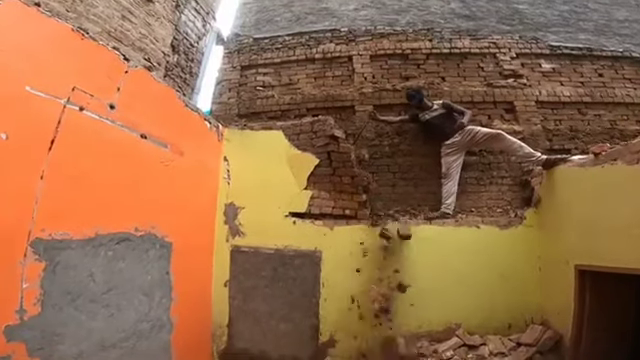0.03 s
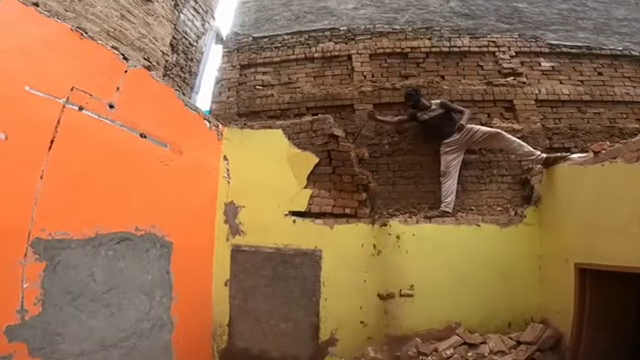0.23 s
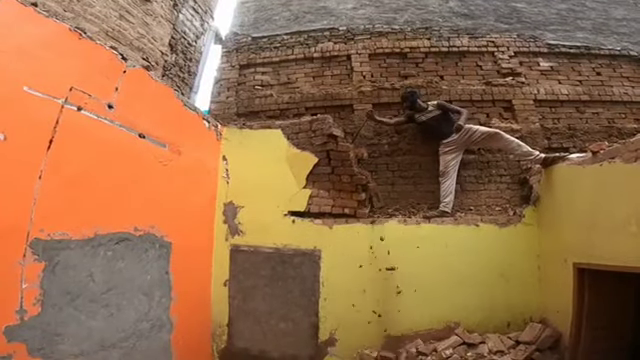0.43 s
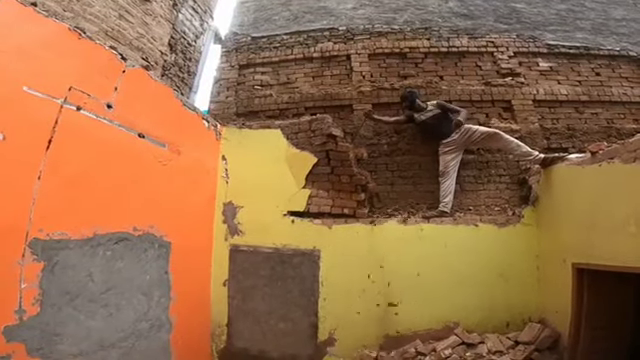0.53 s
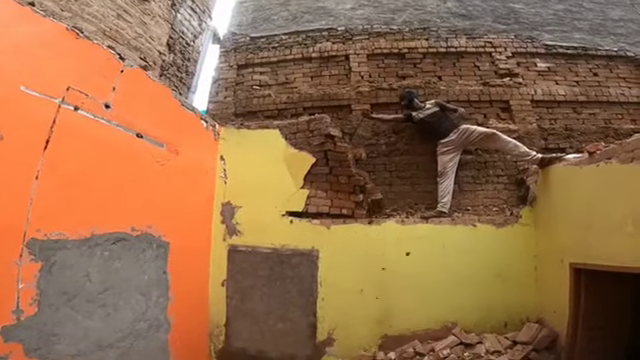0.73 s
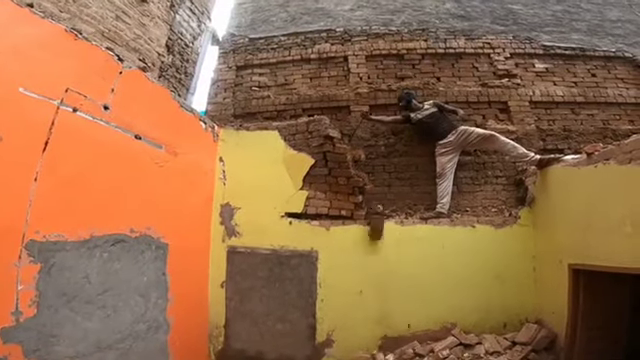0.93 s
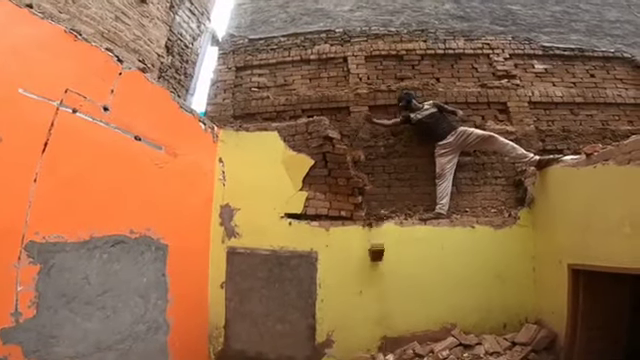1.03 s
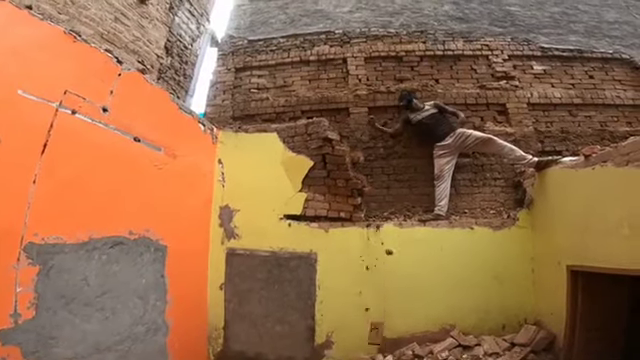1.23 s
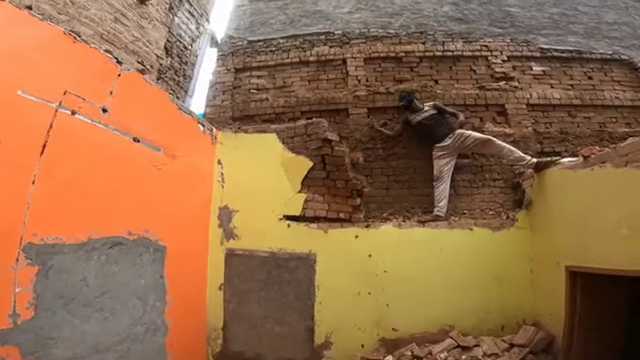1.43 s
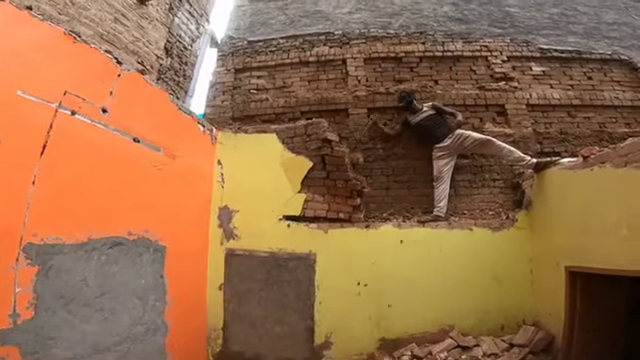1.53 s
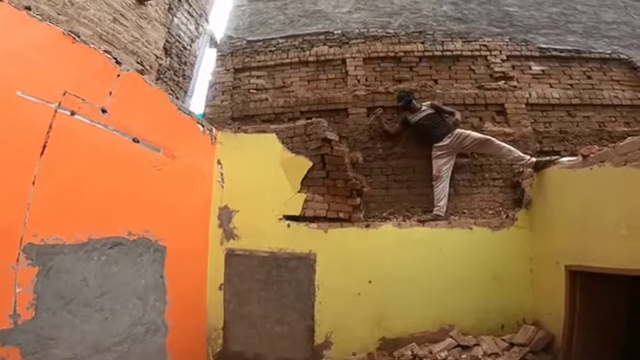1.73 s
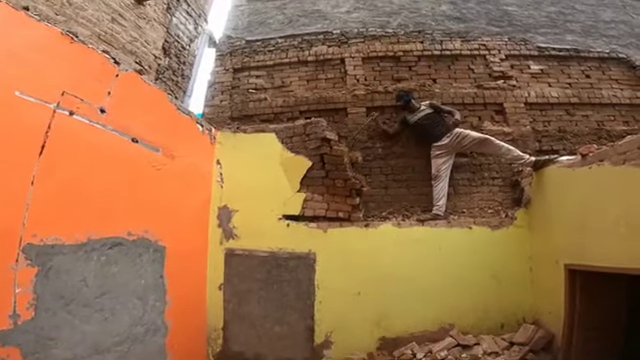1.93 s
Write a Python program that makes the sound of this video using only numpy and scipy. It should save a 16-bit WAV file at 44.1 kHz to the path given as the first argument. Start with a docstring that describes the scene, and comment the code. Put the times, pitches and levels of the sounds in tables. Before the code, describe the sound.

Falling bricks crunch, knock and clink on nearby rubble in a quick flurry. Small chips and grit follow, then one more heavy piece hits with a short ring, in a bare-walled room open to a faint outdoor hush.

```python
"""A roofless, bare-walled room, one microphone near a rubble heap as bricks and lumps of mortar drop on it.
Each landing is a short crunch of brittle modes, a knock and a few flying chips. Hard shards ring on,
heavy pieces thump the heap and grit trickles after them. The walls answer briefly; behind it all
lies a distant outdoor hush, and a faint breeze stirs the microphone."""
import sys
import numpy as np
from scipy import signal
from scipy.fft import rfft, irfft
from scipy.io import wavfile

SR = 44100
rng = np.random.default_rng(int(sys.argv[2]) if len(sys.argv) > 2 else 0)


def waveform_to_disk(signal):
    """Save audio, clipped to [-1, 1], as 16-bit WAV at the path in sys.argv[1]."""
    frames = np.transpose(np.atleast_2d(signal))
    scaled = np.clip(frames, -1, 1) * 32767
    samples = np.round(scaled).astype(np.int16)
    wavfile.write(sys.argv[1], SR, samples)


N = 88200


def from_db(db):
    return 10 ** (np.asarray(db) / 20)


def unit_rms(x):
    return x / np.sqrt(np.mean(x ** 2) + 1e-20)


def at_hz(curve, hz):
    return np.interp(np.log(hz), np.log(np.array(curve)[:, 0]), np.array(curve)[:, 1])


def add(out, start_s, sound):
    i = max(int(start_s * SR), 0)
    out[i:i + len(sound)] += sound


def tone(hz, t, t60, rise_s):
    """A decaying sine with a soft start."""
    t = np.maximum(t, 0)
    envelope = from_db(-60 * t / np.maximum(t60, .003)) * (1 - np.exp(-t / rise_s))
    return envelope * np.sin(2 * np.pi * hz * t)


def ring(clicks, hz, t60):
    """A unit click sets a sine of height 1 ringing."""
    r, w = from_db(-60 / (max(t60, .002) * SR)), 2 * np.pi * hz / SR
    return signal.lfilter([0, np.sin(w)], [1, -2 * r * np.cos(w), r * r], clicks + 1e-18)


def coloured(spectrum):
    """Noise of rms 1, its spectrum drawn through (Hz, dB) points."""
    hz = np.maximum(np.arange(N // 2 + 1) * SR / N, 1)
    return unit_rms(irfft(rfft(rng.standard_normal(N)) * from_db(at_hz(spectrum, hz)), N))


def outdoor_hush(level_db=-61):
    """Distant open air, steady and dull."""
    return from_db(level_db) * coloured([(100, -12), (450, -10), (2000, -19), (6000, -31), (15500, -47)])


def breeze(swing_hz=12.1, swing_db=-44.5, rumble_hz=37.5, rumble_db=-58):
    """Slow pressure swings right on the microphone, with a little rumble above them."""
    swing = coloured([(1, -12), (swing_hz, 0), (2 * swing_hz, -12), (300, -120)])
    rumble = coloured([(10, -20), (rumble_hz, 0), (100, -14), (2000, -120)])
    return from_db(swing_db) * swing + from_db(rumble_db) * rumble


# The room's decay. Each row: frequency in Hz, time to fall 60 dB in seconds.
WALL_T60 = [(150, 0.39), (1000, 0.31), (3500, 0.32), (14000, 0.35)]


def walls(sound, level_db=-7.5, onset_s=.0022):
    """Dense, uneven reflections off the bare walls, dying at a rate that depends on pitch."""
    t = np.arange(SR * 3 // 4) / SR
    edges_hz = np.geomspace(80, 18000, 13)
    taps = rng.standard_normal((2, len(t)))
    taps *= from_db(2 * rng.standard_normal(len(t) // 100 + 1)).repeat(100)[:len(t)]
    echo = 0
    for k, (low, high) in enumerate(zip(edges_hz, edges_hz[1:])):
        band = signal.sosfilt(signal.butter(2, [low, high], "band", fs=SR, output="sos"), taps[k % 2])
        t60 = at_hz(WALL_T60, np.sqrt(low * high))
        echo += band * from_db(-60 * t / t60) / np.sqrt(t60)
    echo *= np.clip(t / onset_s - .5, 0, 1)
    return from_db(level_db) * signal.fftconvolve(sound, echo / np.sqrt(np.sum(echo ** 2)))[:N]


# The colour of the grit. Each row: frequency in Hz, relative level in dB.
GRIT_SPECTRUM = [(71, -45), (120, -31), (796, -1), (1620, -7.5), (1910, -1.5), (6330, -10.5),
                 (15500, -51.5)]
# The trickle down the heap. Each row: time in seconds, relative level in dB.
TRICKLE_LEVELS = [(0, -47), (.17, -40), (.25, -32), (.47, -31.5), (.6, -43), (.75, -38.5), (0.949, -45.5),
                  (1.1, -51.5), (1.219, -54), (1.36, -60), (1.47, -53.5), (1.6, -46), (1.8, -47), (2, -47)]


def grit(crumb_envelope, trickle_db=-3, grains_per_s=14000, ring_cycles=14, modes=48):
    """Uneven grains strike short resonances: a sandy trickle that swells with each rush of crumbs."""
    grains = from_db(2.5 * np.minimum(rng.exponential(1, N), 5)) * rng.choice([-1, 1], N)
    grains *= rng.random(N) < grains_per_s / SR
    struck_mode, sand = rng.integers(0, modes, N), np.zeros(N)
    for k, hz in enumerate(np.geomspace(150, 15000, modes)):
        ticks = ring(grains * (struck_mode == k), hz, ring_cycles / hz)
        sand += from_db(at_hz(GRIT_SPECTRUM, hz)) * hz * ticks
    times, levels_db = np.transpose(TRICKLE_LEVELS)
    trickle = from_db(trickle_db + np.interp(np.arange(N) / SR, times, levels_db))
    return (crumb_envelope + trickle) * unit_rms(sand)


# Shudders of the heap. Each row: start in seconds, level in dB, pitch in Hz.
HEAP_THUMPS = [(0.245, -25.5, 63), (0.418, -31.5, 70.8), (0.6, -38, 79), (0.929, -40, 113),
               (1.171, -47, 95), (1.517, -37, 67.6)]


def heap_thumps():
    """The heap gives a soft, low push under a heavy piece."""
    out, t = np.zeros(N + SR), np.arange(SR // 2) / SR
    for start, db, hz in HEAP_THUMPS:
        add(out, start, from_db(db) * tone(hz, t, t60=.14, rise_s=.0022))
    return out[:N]


# Hard-fired shards. Each row: start in seconds, level in dB, pitch in Hz, time to fall 60 dB in seconds.
SHARD_RINGS = [(0.056, -18, 3188, 0.051), (0.208, -5.5, 3190, 0.037), (0.227, -7.5, 3287, 0.062),
               (0.242, -6.5, 2496, 0.049), (0.256, -14.5, 4400, 0.043), (0.366, -18, 3044, 0.055),
               (.428, -12.5, 4300, 0.028), (.251, -13.5, 2190, 0.23), (.278, -34, 2610, 0.7),
               (0.418, -10, 2410, 0.053), (0.462, -27, 2572, 0.32), (1.124, -34, 3730, 0.035),
               (1.164, -30.5, 1525, 0.21), (1.165, -28.5, 1663, 0.21), (1.19, -39, 2303, 0.14),
               (1.513, -10, 1524, 0.17), (1.514, -8, 957.6, 0.1), (1.69, -35.5, 3670, 0.047),
               (1.513, -14, 3055, 0.051), (1.728, -7, 2223, 0.017), (1.95, -21.5, 2030, 0.13)]


def shards(flutter_db=2.5, rise_s=.002):
    """Shards ring on while they rock, so each ring flutters; close partner modes roughen it."""
    out, t = np.zeros(N + SR), np.arange(SR // 2) / SR
    for start, db, hz, t60 in SHARD_RINGS:
        above, below = .015 + .03 * rng.random(2)
        partners = sum(tone(hz * ratio, t, .6 * t60, rise_s) for ratio in (1 + above, 1 - below))
        add(out, start, from_db(db) * (tone(hz, t, t60, rise_s) + .4 * partners))
    rocking = coloured([(5, 37), (70, -20), (1000, -62)])
    return out[:N] * from_db(flutter_db * rocking)


# Pieces hitting the heap near the microphone. Each row: start in seconds, level in dB, knock pitch in Hz,
# then, in dB relative to that level, the knock and the crunch's thud, body, clack and crack bands.
LANDING_HITS = [(0.004, -21, 1130, -14, -43, -8, -2.5, -18), (0.054, -15.5, 3180, 4.5, -47, -42, -9, -27),
                (0.204, -0.5, 670, -5.5, -11, -7, -14, -18), (0.21, -5, 1390, 7.5, -14, -32, -3, -27),
                (0.227, -0.5, 940, -4.5, -37, -8, -8, -24), (0.233, -2.5, 810, 4, -19, -16, -10, -32),
                (0.25, -1, 2260, 4, -56, -5.5, -16, -31), (0.268, -11.5, 1070, 1.5, -5, -17, -22, -34),
                (0.366, -12.5, 1574, 6.5, -17, -5, -10, -40),
                (0.375, -4, 1530, -2.5, -25, -21, -4.5, -28.5), (0.393, 0.5, 720, -8, -18, -20, -25, -19.5),
                (0.403, -7, 620, 1, -31, -7, -4.5, -21), (0.414, -7.5, 1760, -1, -35, -23, -5.5, -15.5),
                (0.427, -2, 955, -1, -29, -7.5, -10.5, -27), (0.445, -10, 905, -18, -20, -3, -27, -19),
                (0.515, -13, 2230, 4.5, -44, -29, -4, -21), (0.521, -18, 657, 3.5, -41, -36, -2.5, -24),
                (0.562, -12.5, 2730, 2, -20.5, -20, -10, -25), (0.599, 5, 877, 2, -56, -15.5, -18, -28),
                (0.604, 3, 1477, 1.5, -34, -20, -11, -21.5), (0.757, -27, 1540, 2.5, -8, -3, -7, -42),
                (0.804, -22.5, 900, -28, -11.5, -9.5, -8.5, -34),
                (0.827, -21.5, 4600, 0, -15, -20, -5.5, -9), (0.841, -25.5, 706, -10, -3, 0.5, -37, -36),
                (0.885, -18, 920, -22, -17, -7, -6, -19.5), (0.917, -17, 5900, 9, -6.5, -59, -13, -16.5),
                (0.991, -17, 1570, -12, -39, -7, -4, -17), (1.009, -12.5, 1590, 1, -57, -19, -9.5, -17.5),
                (1.108, -31, 3860, -8, -22, -29, -14, -11),
                (1.163, -16, 1080, 2.5, -6, -18.5, -12.5, -25.5), (1.26, -37, 1650, -8, -28, -15, -2, -18),
                (1.424, -27, 547, -3.5, -4.5, -9.5, -6, -17.5), (1.449, -32, 658, 3, -5, -26, -9.5, -17.5),
                (1.48, -35.5, 510, 1.5, 1, -18, -34, -28), (1.505, -11, 3420, -11, -30, -8, -4, -4),
                (1.509, 2, 1220, -8, -20.5, -3.5, -13.5, -27), (1.512, 0.5, 698, -0.5, -33, -13, -7.5, -35),
                (1.619, -25, 680, -2, -15, 0, -8.5, -39), (1.687, -32.5, 3710, -2, -33, -20, -1, -6.5),
                (1.704, -25.5, 860, -23, -11, 1.5, -10, -42),
                (1.728, -10.5, 1580, 4.5, -60, -5, -8.5, -23.5),
                (1.748, -13.5, 1000, -26, -26, -3, -11, -21.5), (1.81, -26.5, 680, -2.5, -1, -16, -7, -26),
                (1.853, -27.5, 760, -12, -27, -0.5, -18, -19), (1.907, -33.5, 1100, -1, -38, -34, 3, -9),
                (1.939, -20.5, 2450, 2, -47, -53, -5.5, -16.5),
                (1.951, -17.5, 1924, -29, -25, -4.5, -60, -42)]


def crumb_rushes(level_db=-14, t60=.061, rise_s=.004):
    """The envelope of the crumbs each landing sheds: a quick swell, sized by its clack, that dies away."""
    shed = np.zeros(N)
    for start, db, *_, clack_db, _ in LANDING_HITS:
        shed[int(start * SR)] = from_db(level_db + db + clack_db)
    dying = signal.lfilter([1], [1, -from_db(-60 / (t60 * SR))], shed)
    smoothing = np.exp(-1 / (rise_s * SR))
    return signal.lfilter([1 - smoothing], [1, -smoothing], dying)


def knocks_and_chips(knock_cycles=11, chip_db=-16.5, chip_lag_s=.014):
    """Each piece knocks once, with a stiff overtone; six chips fly off and clink down just after it."""
    out, t = np.zeros(N + SR), np.arange(3000) / SR
    for start, db, hz, knock_db, _, _, clack_db, _ in LANDING_HITS:
        pitch, timing, strength = rng.random((3, 6, 1))
        overtone_hz = hz * (1.25 + .5 * pitch[0])
        knock = tone(hz, t, knock_cycles / hz, rise_s=.00027)
        knock += .5 * tone(overtone_hz, t, knock_cycles / overtone_hz, rise_s=.0012)
        chip_hz = 900 * 6 ** pitch
        lag = -chip_lag_s * np.log(1 - .95 * timing)
        chips = tone(chip_hz, t - lag, 40 / chip_hz, rise_s=.0002)
        chips *= from_db(clack_db + chip_db + 8 * strength)
        add(out, start, from_db(db) * (from_db(knock_db) * knock + chips.sum(axis=0)))
    return out[:N]


# Damping of brick and mortar. Each row: frequency in Hz, time to fall 60 dB in seconds.
BRICK_T60 = [(150, 0.06), (900, 0.018), (3000, 0.013), (14000, 0.005)]
# The colour all crunches share. Each row: frequency in Hz, relative level in dB.
BRICK_SPECTRUM = [(120, -7), (300, -5), (600, 1.5), (1200, 1), (2400, -5), (5000, 2), (10000, -6.5),
                  (15500, -16.5)]
CRUNCH_BANDS_HZ = 360, 900, 2700, 8000  # thud, body, clack, crack


def crunches(gain_db=8, scatter_db=2, contact_s=.0045, modes=110):
    """Every landing crunches in brittle modes of its own, struck at uneven moments as it touches down."""
    out, t = np.zeros(N + SR), np.arange(2200) / SR
    draws = rng.random((len(LANDING_HITS), 3, modes))
    for (start, db, _, _, *bands_db), (detune, timing, polarity) in zip(LANDING_HITS, draws):
        rank = (np.arange(modes) + detune) / modes  # 0 at the lowest mode, 1 at the highest
        hz = 130 + 15400 * rank ** 2.5
        t60 = at_hz(BRICK_T60, hz)
        mode_db = np.interp(np.log(hz), np.log(CRUNCH_BANDS_HZ), bands_db) + at_hz(BRICK_SPECTRUM, hz)
        mode_db += scatter_db * rng.standard_normal(modes)
        # Even out the energy per octave, whatever the spacing and decay of the modes.
        weight = np.sqrt(rank ** 1.5 * 15400 / hz / modes) / np.sqrt(t60 * 50)
        heights = from_db(db + gain_db + mode_db) * weight * np.sign(polarity - .5)
        lag = -contact_s * np.log(1 - .95 * timing)
        lag *= 1 - .35 * rank  # high modes are struck closer together
        add(out, start, heights @ tone(hz[:, None], t - lag[:, None], t60[:, None], rise_s=.000079))
    return out[:N]


def scene(low_cut_hz=172, ring_send_db=-2):
    """Heap, walls and open air meet at one microphone, which feeds both channels."""
    low_cut = signal.butter(2, low_cut_hz, "high", fs=SR, output="sos")
    rubble = signal.sosfilt(low_cut, crunches() + grit(crumb_rushes()))
    rings = signal.sosfilt(low_cut, knocks_and_chips() + shards())
    reflections = walls(rubble + from_db(ring_send_db) * rings)  # rings reach the walls more weakly
    mono = rubble + rings + reflections + heap_thumps() + outdoor_hush() + breeze()
    return np.array([mono, mono])


def record(dry, dip_hz=5184, dip_width_hz=1030, dip_depth=.65, cutoff_hz=16100):
    """The microphone has a dip in the low treble; peaks are rounded and the top is cut."""
    dip_band = signal.lfilter(*signal.iirpeak(dip_hz, dip_hz / dip_width_hz, fs=SR), dry)
    rounded = 1.1 * np.tanh((dry - dip_depth * dip_band) / 1.1)
    return signal.sosfilt(signal.cheby2(12, 60, cutoff_hz, fs=SR, output="sos"), rounded)


dry = scene()
out = record(dry)
waveform_to_disk(out)
```